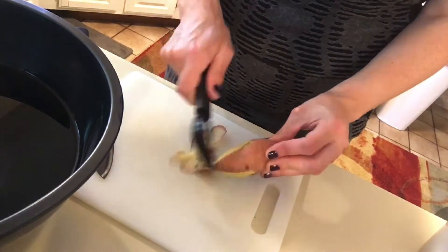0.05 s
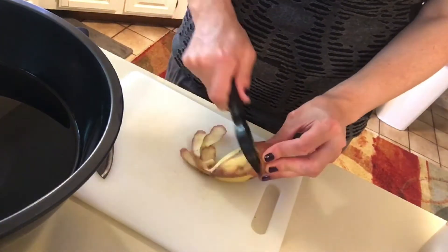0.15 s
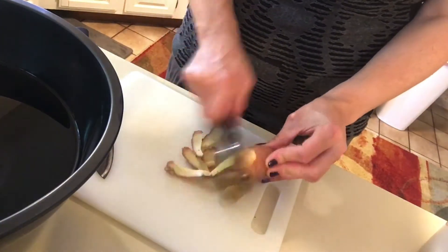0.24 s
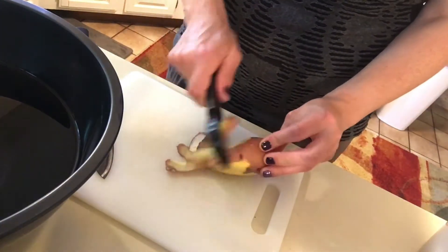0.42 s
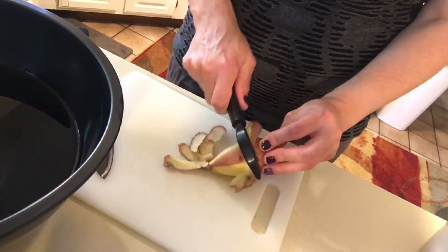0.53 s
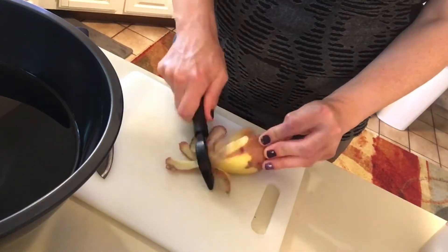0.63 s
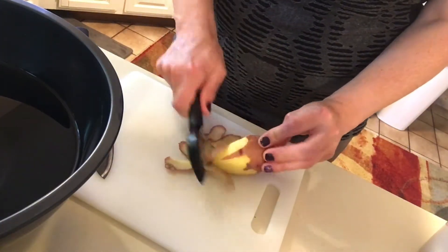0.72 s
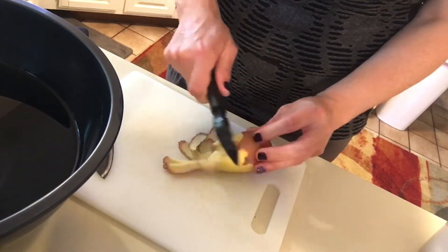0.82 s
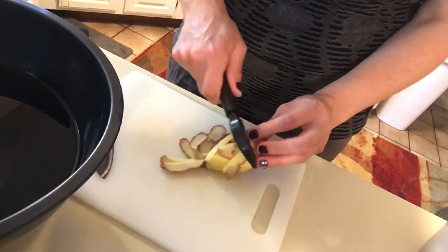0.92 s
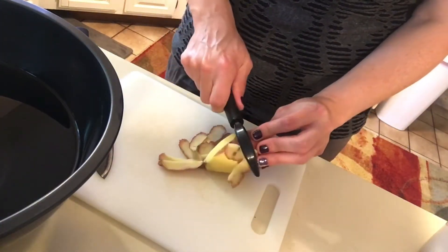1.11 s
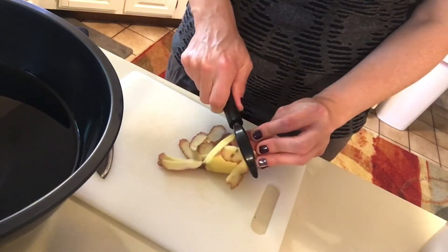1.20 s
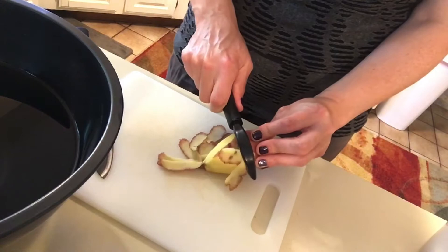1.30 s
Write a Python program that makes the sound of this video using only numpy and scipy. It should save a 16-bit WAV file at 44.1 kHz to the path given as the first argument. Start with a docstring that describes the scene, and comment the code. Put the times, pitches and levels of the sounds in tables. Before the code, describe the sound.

A swivel peeler strips a potato, heard close through a small, bass-light microphone in a hard-walled kitchen. Faint brushing and blade ticks come first; a short gritty hiss at 0.18 seconds ends in a bright, loud crack at 0.21. A second stroke bites at 0.52 and slams at 0.55. Sparse ticks, soft knocks at 0.93 and 1.29, and brushing follow over faint beating motor hum.

```python
"""Two appliance motors hum and beat in a small kitchen; fingers brush and a loose blade ticks. Then a swivel
peeler strips a potato on a plastic board in two strokes: the blade bites, hisses through the skin and the frame
slams on the board. More ticks, soft knocks and brushing follow. Motors are sums of shaft harmonics, hiss, brushing
and air are shaped noise, struck bodies are decaying modes, the echo is a decaying noise response."""
import sys
import numpy as np
from scipy import signal
from scipy.fft import rfft, irfft
from scipy.io import wavfile
from scipy.ndimage import uniform_filter1d

SR = 44100
rng = np.random.default_rng(int(sys.argv[2]) if len(sys.argv) > 2 else 0)


def to_wav(s):
    """Save 16-bit WAV."""
    ch = np.atleast_2d(s).T  # columns
    pcm = np.round(np.clip(ch, -1, 1) * 32767)  # PCM
    wavfile.write(sys.argv[1], SR, pcm.astype(np.int16))


N = 59535
T = np.arange(N) / SR


def amp(db):
    """Decibels to gain."""
    return 10 ** (np.asarray(db, float) / 20)


def fade(t, t60_s):
    """Exponential decay by 60 dB in t60_s."""
    return np.exp(-np.log(1000) * t / t60_s)


def add(out, start_s, x):
    """Mixes x into out at start_s."""
    i = int(round(start_s * SR))
    out[i:i + len(x)] += x[:N - i]


def to_peak(x, db):
    """Scales x to a peak level in dB."""
    return amp(db) * x / np.abs(x).max()


def coloured(points):
    """Noise of rms 1 with a (Hz, dB) spectrum, interpolated over log frequency."""
    hz, db = np.array(points).T
    f = np.maximum(np.arange(N // 2 + 1) * SR / N, 1)
    gain = amp(np.interp(np.log(f), np.log(hz), db))
    y = irfft(rfft(rng.standard_normal(N)) * gain, N)
    return y / y.std()


def walk(rate_hz):
    """Slow random curve, standard deviation 1: noise averaged twice over 1 / rate_hz."""
    k = int(SR / rate_hz)
    y = uniform_filter1d(uniform_filter1d(rng.standard_normal(N), k), k)
    return y / y.std()


def band(x, hz, octaves):
    """Band-pass around hz."""
    edges = [hz * 2 ** (-octaves / 2), min(hz * 2 ** (octaves / 2), .45 * SR)]
    return signal.sosfilt(signal.butter(2, edges, "bandpass", fs=SR, output="sos"), x)


def high(x, hz, order):
    """High-pass."""
    return signal.sosfilt(signal.butter(order, hz, "highpass", fs=SR, output="sos"), x)


def ring(modes, ratio, scatter_db, ring_scale, strike_s):
    """Struck body, peak 1: decaying sine modes whose onset builds over strike_s."""
    t = T[:SR // 6]
    hz, db, t60_s = np.array(modes).T[:, :, None]
    gain = amp(db + scatter_db * rng.standard_normal(db.shape))
    y = np.sum(gain * fade(t, t60_s * ring_scale) * np.sin(2 * np.pi * hz * ratio * t), axis=0)
    y = y * (1 - np.exp(-(t / strike_s) ** 2))
    return y / np.abs(y).max()


def push(length_s):
    """Half-sine contact force of area 1."""
    phase = (np.arange(int(length_s * SR) + 2) + .5) / (length_s * SR + 1)
    y = np.sin(np.pi * np.clip(phase, 0, 1))
    return y / y.sum()


# Room air spectrum. Each row: frequency in Hz, relative density in dB per Hz.
AIR_SPECTRUM = [(30, 6.5), (60, -5), (90, -4.5), (200, 4), (400, -6), (700, -8.5), (1200, -15.5),
                (2500, -15), (5000, -19), (9000, -23), (13000, -27), (16000, -31.5)]
AIR_DB, AIR_FLICKER_DB, AIR_FLICKER_HZ = -63, .5, 3.7


def room_air():
    """Steady shaped noise with a slight slow level flicker."""
    return amp(AIR_DB + AIR_FLICKER_DB * walk(AIR_FLICKER_HZ)) * coloured(AIR_SPECTRUM)


# Shaft speeds of the first and second motor. Each row: time in seconds, speed in Hz.
SPEED_A = [(0, 46.65), (.22, 46.7), (.3, 46.12), (.57, 46.12), (.62, 46.47), (1.12, 46.47), (1.16, 46.17),
           (1.35, 46.15)]
SPEED_B = [(0, 48.75), (1.35, 48.75)]
# Motor level curves. Each row: time in seconds, level in dB, lift of the top order in dB.
LEVEL_A = [(0, -69.5, 2), (.4, -71, -11.5), (.65, -63.5, -5.5), (.88, -62, -14.5), (.98, -64.5, 3),
           (1.35, -62, -2)]
LEVEL_B = [(0, -63.5, -4), (.6, -64, -2), (1.35, -64.5, -2)]
# Motor harmonics. Each row: multiple of shaft speed, level in dB relative to the motor's level.
ORDERS_A = [(2, -15.5), (3, -31.5), (4, 2), (5, -19.5), (6, -12.5), (8, -13), (9, -13), (12, -8.5)]
ORDERS_B = [(2, -6), (3, -14), (4, 0.5), (5, -11), (7, -13.5), (8, -2)]
IN_STEP_S = .962  # every line peaks here, so the two hums add up
WAVER_DB, WAVER_HZ = 1.2, 8


def motor(speed, curve, orders):
    """Lines at multiples of the shaft speed, each wavering a little."""
    turn_rad = 2 * np.pi * np.cumsum(np.interp(T, *np.array(speed).T)) / SR
    turn_rad = turn_rad - np.interp(IN_STEP_S, T, turn_rad)
    time_s, level_db, lift_db = np.array(curve).T
    lift_db = np.interp(T, time_s, lift_db)
    top = orders[-1][0]
    hum = np.zeros(N)
    for k, db in orders:
        line_db = db + WAVER_DB * walk(WAVER_HZ) + lift_db * (k == top)
        hum += amp(line_db) * np.cos(round(k) * turn_rad)
    return np.sqrt(2) * amp(np.interp(T, time_s, level_db)) * hum


# Kitchen echo. Each row: band centre in Hz, relative level in dB, tail t60 in seconds.
ECHO_BANDS = [(270, -13.5, 0.15), (450, -16, 0.33), (1180, -3, 0.18), (2020, -5.5, 0.27),
              (3493, -11.5, 0.22), (5340, -21, 0.17), (8000, -16, 0.063), (12200, -10, 0.16),
              (14900, -18.5, 0.36)]
ROOM_DB, ROOM_GAP_S, BAND_OCT = -26, .0035, .96
EARLY_DB, EARLY_T60_S = 7.5, .064


def kitchen(x):
    """Hard walls: a quick noise cluster of reflections plus a tail with its own decay in each band."""
    t = T[:SR // 3]
    echo = np.zeros(len(t))
    for hz, db, t60_s in ECHO_BANDS:
        decay = fade(t, t60_s) + amp(EARLY_DB) * fade(t, EARLY_T60_S)
        echo += amp(db + ROOM_DB) * band(rng.standard_normal(len(t)), hz, BAND_OCT) * decay
    echo *= np.clip((t / ROOM_GAP_S) ** 2, 0, 1)
    return signal.fftconvolve(x, echo)[:N]


# Fingers brushing the peel. Each row: middle in seconds, width at 1/e in seconds, level in dB before flutter.
BRUSHES = [(0.095, 0.13, -79.5), (1.128, 0.034, -70), (1.275, 0.037, -67), (1.345, .03, -75)]
BRUSH_FLUTTER_DB, BRUSH_FLUTTER_HZ = 3.3, 200


def brushing():
    """Faint bright noise in bell-shaped swells with a fast random flutter."""
    swell = sum(amp(db) * np.exp(-(2 * (T - mid_s) / width_s) ** 2) for mid_s, width_s, db in BRUSHES)
    noise = coloured([(1500, -24.0), (4000, -5.5), (8000, -10), (16000, -14)])
    return swell * noise * amp(BRUSH_FLUTTER_DB * walk(BRUSH_FLUTTER_HZ))


# Board modes, also used by the thuds. Each row: frequency in Hz, relative level in dB,
# t60 in seconds before ring_scale.
BOARD_MODES = [(140, -14, .08), (240, -12, .06), (466, 1, .07), (560, -9, .035), (775, 0, .035),
               (1000, -13, .025), (1540, -17, .035), (2490, -5, .035)]
# Potato knocks. Each row: start in seconds, level in dB before contact smoothing, contact in seconds.
KNOCKS = [(.9320, -48.5, .0002), (1.2850, -47, .0006), (1.3410, -50, .0006)]
KNOCK_LOW_HZ, KNOCK_STRIKE_S = 650, .002


def knocks(ring_scale):
    """Soft potato taps: a half-sine contact force rings the upper board modes."""
    out = np.zeros(N)
    upper = [m for m in BOARD_MODES if m[0] > KNOCK_LOW_HZ]
    tap = ring(upper, 1, 0, ring_scale, KNOCK_STRIKE_S)
    for start_s, db, contact_s in KNOCKS:
        add(out, start_s, amp(db) * np.convolve(tap, push(contact_s)))
    return out


# Steel blade modes. Each row: frequency in Hz before BLADE_RATIO, relative level in dB,
# t60 in seconds before ring_scale.
BLADE_MODES = [(2800, -12, .004), (5250, -1, .004), (6970, -3, .008), (7600, -1, .005), (8300, -5, .004),
               (10500, -2, .004), (12100, -6, .004), (13000, -8, .004), (14400, -5, .004)]
# Blade ticks. Each row: start in seconds, peak ring level in dB, a third of the rattle t60 in seconds,
# crack centre in Hz.
TICKS = [(.0705, -60, 0.0022, 10600), (0.081, -51, 0.0042, 8300), (0.11, -46.5, 0.0031, 9800),
         (.1790, -39, 0.0025, 7140), (0.222, -30.5, 0.003, 11000), (0.3535, -57.5, 0.0031, 7000),
         (0.4460, -27, 0.00044, 9220), (0.524, -42.5, 0.0042, 7000), (0.5457, -33, 0.0035, 10500),
         (0.647, -42, 0.0044, 6350), (0.788, -56.5, 0.0034, 7046), (0.9059, -51.5, .003, 9840),
         (0.9101, -42, 0.0048, 8500), (0.9138, -43.5, 0.0012, 8000)]
BLADE_RATIO, TICK_SCATTER_DB, STRIKE_S = .97, 2.5, .0001
TICK_CRACK_DB, TICK_WIDTH_OCT, TICK_ATTACK_S = 4, 2.0, .00025


def ticks(ring_scale):
    """The loose blade rattles in its pivots: a band-passed crack excites the blade modes near it."""
    out, t = np.zeros(N), T[:400]
    for start_s, db, length_s, hz in TICKS:
        rattle = rng.standard_normal(400) * fade(t, 3 * length_s) * np.clip(t / TICK_ATTACK_S, 0, 1)
        crack = band(rattle, hz, TICK_WIDTH_OCT)
        rung = np.convolve(crack, ring(BLADE_MODES, BLADE_RATIO, TICK_SCATTER_DB, ring_scale, STRIKE_S))
        add(out, start_s, to_peak(rung, db))
        add(out, start_s, to_peak(crack, db + TICK_CRACK_DB))
    return out


# Blade hiss in the skin. Each row: frequency in Hz, relative density in dB per Hz.
HISS_SPECTRUM = [(900, -23.5), (1500, -16), (2500, -22.5), (3300, -11), (4400, -0.5), (5700, -9.5),
                 (6800, 5), (13000, -22), (16000, -25.5)]
# Low rumble of the board shaken by the cut. Each row: frequency in Hz, relative density in dB per Hz.
RUMBLE_SPECTRUM = [(100, -10), (230, -7.5), (500, -9), (700, -32.5), (2000, -71.5)]
# Plastic frame modes. Each row: frequency in Hz before the stroke's ratio, relative level in dB,
# t60 in seconds before ring_scale.
FRAME_MODES = [(1523, -14, 0.012), (2000, -15.5, 0.01), (2532, -19.5, 0.017), (3583, -5.5, 0.0074),
               (4614, -8.5, 0.0074), (5170, -9.5, 0.01), (5350, 2.5, 0.003), (6400, -13.5, 0.0068),
               (9180, -14.5, 0.0063), (10000, -21, 0.0087), (12300, -25, 0.011), (13500, -31, 0.0086),
               (14600, -25.5, 0.0079)]
# Strokes. Each row: bite in seconds, slam in seconds, cut level in dB, hollow ring level in dB,
# hollow ring t60 in seconds, thud peak in dB, frame pitch ratio.
STROKES = [(0.1777, .2059, -51.5, -47, .6, -28.5, .99), (0.5241, 0.546, -46, -37.5, 0.056, -27, 0.982)]
CUT_ATTACK_S, CUT_RELEASE_T60_S = .006, .004
CUT_GRIT_DB, CUT_GRIT_HZ, RUMBLE_DB = 2, 810, 2
HOLLOW_HZ, HOLLOW_WAVER_DB, HOLLOW_WAVER_HZ = 790, 2, 60
SLAM_DB, SLAM_LOW_HZ, SLAM_STRIKE_S, MODE_SCATTER_DB = -1.6, 2480, .00013, 1.5
THUD_LATE_S, THUD_PUSH_S, THUD_LOW_HZ, THUD_STRIKE_S = .001, .00029, 250, .0025


def cuts(hollow_gain):
    """Gritty hiss of the blade in the skin, with the rumble and hollow ring of the shaken board."""
    out = np.zeros(N)
    hiss = coloured(HISS_SPECTRUM) * amp(CUT_GRIT_DB * walk(CUT_GRIT_HZ))
    rumble = amp(RUMBLE_DB) * coloured(RUMBLE_SPECTRUM)
    waver = amp(HOLLOW_WAVER_DB * walk(HOLLOW_WAVER_HZ))
    hollow = waver * np.sqrt(2) * np.sin(2 * np.pi * HOLLOW_HZ * T)
    for bite_s, slam_s, cut_db, ring_db, ring_t60_s, _, _ in STROKES:
        release = fade(np.maximum(T - slam_s, 0), CUT_RELEASE_T60_S)
        on = np.clip((T - bite_s) / CUT_ATTACK_S, 0, 1) * release
        out += amp(cut_db) * (on * hiss + on ** 2 * rumble)
        decay = fade(np.maximum(T - bite_s, 0), ring_t60_s)
        out += amp(ring_db) * hollow_gain * on ** 2 * hollow * decay
    return out


def slams(ring_scale):
    """The frame cracks on the board in its own modes; the board thuds just after."""
    out = np.zeros(N)
    for _, slam_s, _, _, _, thud_db, ratio in STROKES:
        crack = ring(FRAME_MODES, ratio, MODE_SCATTER_DB, ring_scale, SLAM_STRIKE_S)
        crack = high(crack, SLAM_LOW_HZ, order=5)  # the thin frame radiates no bass
        add(out, slam_s, to_peak(crack, SLAM_DB))
        board = ring(BOARD_MODES, 1, MODE_SCATTER_DB, ring_scale, THUD_STRIKE_S)
        thud = high(np.convolve(board, push(THUD_PUSH_S)), THUD_LOW_HZ, order=2)
        add(out, slam_s + THUD_LATE_S, to_peak(thud, thud_db))
    return out


# Echo feed: ring times (and hollow ring gain) relative to the direct sound, for a smooth tail.
ECHO_RING_SCALE = .18
ECHO_TICK_DB = -4  # level of the ticks in the echo feed


def hands(ring_scale, tick_db):
    """All sounds at the board; ring_scale multiplies mode ring times and the hollow ring's gain."""
    touch = brushing() + knocks(ring_scale)
    return touch + amp(tick_db) * ticks(ring_scale) + cuts(ring_scale) + slams(ring_scale)


def scene():
    """Air of the room, the motors, the hands at the board and their echo."""
    motors = motor(SPEED_A, LEVEL_A, ORDERS_A) + motor(SPEED_B, LEVEL_B, ORDERS_B)
    near = hands(1, 0)
    echo = kitchen(hands(ECHO_RING_SCALE, ECHO_TICK_DB))
    return (room_air() + motors + near + echo)[None]


MIC_LOW_HZ, TOP_HZ = 72, 16300


def record(dry):
    """A small microphone with little bass; the top is cut."""
    low_cut = high(dry, MIC_LOW_HZ, order=4)
    return signal.sosfilt(signal.ellip(8, .2, 70, TOP_HZ, fs=SR, output="sos"), low_cut)


dry = scene()
out = record(dry)
to_wav(out)
```